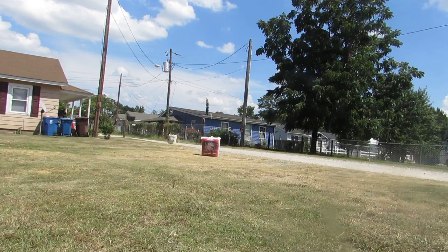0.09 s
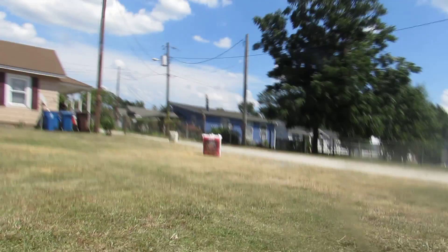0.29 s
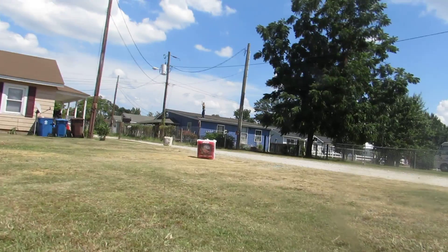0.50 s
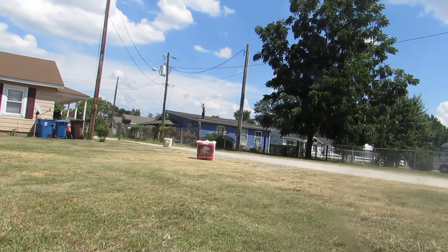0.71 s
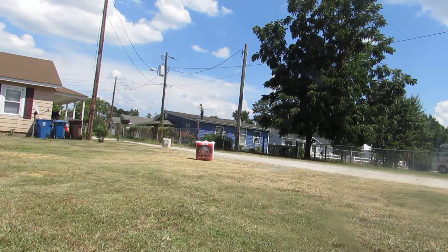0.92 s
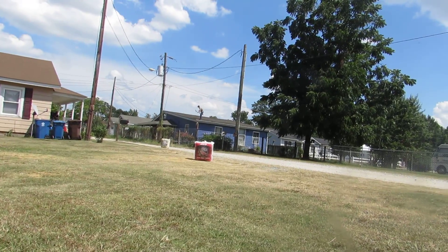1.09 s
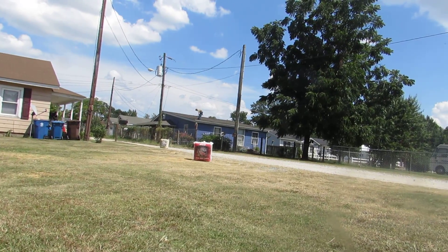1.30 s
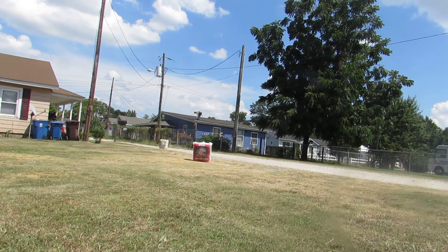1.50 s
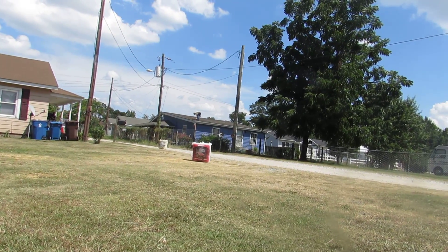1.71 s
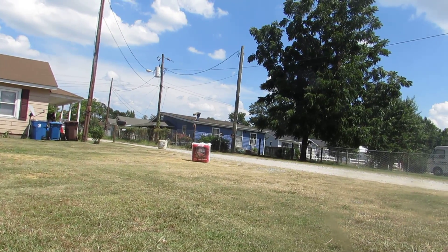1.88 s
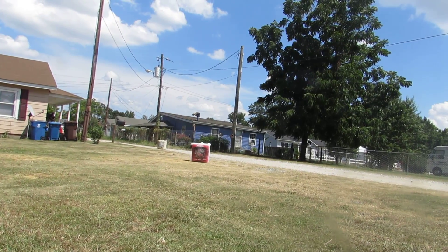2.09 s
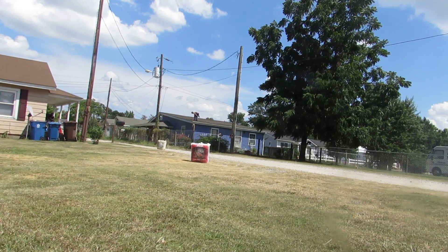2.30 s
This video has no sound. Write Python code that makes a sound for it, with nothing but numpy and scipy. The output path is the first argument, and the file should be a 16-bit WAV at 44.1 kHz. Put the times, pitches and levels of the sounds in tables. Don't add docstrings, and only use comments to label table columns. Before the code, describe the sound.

Outdoors on a lawn, a brief rising hiss ends in a sharp overloaded thwack and dead thud, followed by gritty scratches and dull knocks; wind rumbles on the microphone while the ducked background creeps back.

```python
import sys
import numpy as np
from scipy import signal
from scipy.fft import rfft, irfft
from scipy.io import wavfile
from scipy.ndimage import uniform_filter1d

SR = 44100
rng = np.random.default_rng(int(sys.argv[2]) if len(sys.argv) > 2 else 0)


def master(y):
    cut = np.clip(np.atleast_2d(y).T, -1, 1)
    pcm = np.round(cut * 32767)
    wavfile.write(sys.argv[1], SR, pcm.astype(np.int16))


def natural_amplitude(level_db):
    exponent = np.asarray(level_db, float) / 20
    return 10 ** exponent


N = 110250
TIME = np.arange(N) / SR
HIT_S = .201761


def evened(x):
    return x / np.sqrt(np.mean(x ** 2) + 1e-20)


def read(points, hz):
    f, value = np.transpose(points)
    return np.interp(np.log(hz + 1), np.log(f + 1), value)


def coloured(points, same, lean=((1, 0), (2, 0))):
    a, b = rfft(rng.standard_normal((2, N)))
    hz = np.fft.rfftfreq(N, 1 / SR)
    like = np.clip(read(same, hz), 0, 1)
    pair = np.array([a, like * a + np.sqrt(1 - like ** 2) * b])
    level_db = read(points, hz) + np.array([[.5], [-.5]]) * read(lean, hz)
    return evened(irfft(pair * natural_amplitude(level_db), N))


def resonant(x, peaks):
    ringing = 0
    for hz, width, db in peaks:
        b, a = signal.iirpeak(hz, hz / width, SR)
        ringing = ringing + natural_amplitude(db) * signal.lfilter(b, a, x)
    return evened(ringing)


def burst(s, db, rise, t60):
    u = TIME - s
    rising = np.exp(np.minimum(u, 0) / abs(rise))
    falling = natural_amplitude(-60 * np.maximum(u, 0) / abs(t60))
    return natural_amplitude(db) * np.where(u < 0, rising, falling)


def slow(top_hz, size):
    t = np.linspace(0, N / SR, size[1])
    curves = 0
    for f in np.geomspace(.3, top_hz, num=16):
        curves = curves + np.sin(2 * np.pi * (f * t + rng.random((size[0], 1)))) / np.sqrt(f)
    return evened(curves)


def wash(points, db, patchy_db, swell_db, gust_hz):
    # frequency in Hz, left-right likeness from 0 to 1.
    likeness = [(60, 1), (180, 0.99), (400, 0.33), (950, 0.65), (2400, 0.85), (3500, 0.86), (6000, 0.68),
                (15000, 0.1)]
    # frequency in Hz, lean to the left in dB.
    left_lean = [(60, 0), (150, .5), (380, 1), (950, -1.5), (2400, -.5), (15000, -.5)]
    frames, hz = N // 256 + 5, np.fft.rfftfreq(1024, 1 / SR)
    a, b, c, d, patches = rng.standard_normal((frames, len(hz), 5)).T
    patches = uniform_filter1d(patches, size=10, axis=0)
    patches = evened(uniform_filter1d(patches, size=10, axis=1))
    same = np.clip(read(likeness, hz), -1, 1)[:, None]
    tilt = natural_amplitude(read(left_lean, hz) / 2)[:, None]
    left = a + 1j * b
    right = same * left + np.sqrt(1 - same ** 2) * (c + 1j * d)
    swell = swell_db * slow(gust_hz, size=(1, frames))
    level_db = read(points, hz)[:, None] + patchy_db * patches + swell
    spectra = np.array([left * tilt, right / tilt]) * natural_amplitude(level_db)
    return natural_amplitude(db) * evened(signal.istft(spectra, nperseg=1024, noverlap=768)[1][:, :N])


def duck():
    u = np.maximum(TIME - HIT_S, 0)
    attack_s = .006
    lasting_db = 15 * np.exp(-u / .8)
    grab_db = 34 * np.exp(-u / .021)
    return natural_amplitude(-(1 - np.exp(-u / attack_s)) * (lasting_db + grab_db))


def yard():
    # frequency in Hz, level in dB per Hz.
    spectrum = [(150, -29), (260, -3.5), (1370, -8.5), (1810, -17), (3360, -24.5), (8000, -24.5),
                (11500, -31), (15300, -38)]
    return wash([(120, -40)] + spectrum, -46, patchy_db=0.0, swell_db=0.7, gust_hz=7.6)


def wind():
    # frequency in Hz, level in dB per Hz.
    spectrum = [(12, -46), (20, -23), (45, -13), (86, -0.5), (112, -1.5), (141, -3), (168, -4.5),
                (262, -14), (500, -28), (650, -42), (1100, -120)]
    # time in seconds, level in dB.
    gusts = [(0.36, -51.5), (0.42, -46.5), (0.45, -52.5), (0.57, -51.5), (0.6, -43), (0.66, -45.5),
             (1.33, -43), (1.42, -46.5), (1.51, -38.5), (1.59, -47), (1.68, -37.5), (1.86, -49),
             (2.0, -39.5), (2.5, -41.5)]
    hum_hz, hum_width_hz = 117.4, 10
    hum = resonant(rng.standard_normal(N), [(hum_hz, hum_width_hz, 0)])
    hum = natural_amplitude(-44.5) * resonant(hum, [(hum_hz, 2 * hum_width_hz, 0)])
    rumble = wash(spectrum + [(900, -77)], -42, patchy_db=1.5, swell_db=-1.3, gust_hz=11)
    s, db = np.transpose(gusts)
    level_db = np.interp(TIME, s, db) - db[-1]
    return (rumble + hum) * np.where(TIME < s[0], duck(), natural_amplitude(level_db))


def screen_whistle():
    return natural_amplitude(-74) * np.sin(2 * np.pi * 15734.5 * TIME)


def fan():
    # multiple of the blade rate, early level in dB, late level in dB.
    multiples = [(16, -78, -75), (17, -82, -82), (18, -83, -70), (19, -74, -73), (20, -84, -76),
                 (21, -78, -76), (22, -81, -77), (23, -78, -81), (24, -68, -77), (25, -78, -75),
                 (26, -76, -70), (27, -70, -75), (28, -81, -66), (29, -70, -69), (30, -76, -74),
                 (31, -70, -76), (32, -77, -77), (33, -70, -75), (34, -80, -78), (35, -74, -74),
                 (36, -84, -81), (37, -76, -72), (39, -80, -79), (41, -80, -80)]
    # frequency in Hz, level in dB.
    whine = [(5957, -70), (6444, -76)]
    blade_hz, drift_hz_per_s = 242.92, .716
    turns = blade_hz * TIME + drift_hz_per_s * TIME ** 2 / 2
    tones = [(k * turns, early_db, late_db) for k, early_db, late_db in multiples]
    tones += [(hz * TIME, db, db) for hz, db in whine]
    fades = slow(3.0, size=(len(tones), 100))
    luck = rng.standard_normal((len(tones), 2))
    out = 0
    for (phase, early_db, late_db), fade, (start, spread) in zip(tones, fades, luck):
        level_db = np.interp(TIME, [.6, 2.1], [early_db, late_db])
        level_db = level_db + 2.2 * np.interp(TIME, np.linspace(0, TIME[-1], len(fade)), fade)
        side_phase = 0.35 * spread * np.array([[1], [-1]])
        out = out + natural_amplitude(level_db) * np.sin(2 * np.pi * (phase + start) + side_phase)
    return natural_amplitude(6 + np.array([[-.4], [.4]])) * out


def birds():
    # start in seconds, length in seconds, level in dB, first Hz, last Hz.
    chips = [
        (.355, .055, -50, 6400, 5750),
        (.888, .058, -53, 6750, 5650),
        (2.06, .09, -61, 5350, 5250),
    ]
    out = 0
    for s, length, db, first_hz, last_hz in chips:
        u = np.clip((TIME - s) / length, 0, 1)
        warble = 110 * np.sin(2 * np.pi * 90 * TIME)
        hz = first_hz + (last_hz - first_hz) * u + warble
        out = out + natural_amplitude(db) * np.sin(np.pi * u ** 1.4) * np.sin(2 * np.pi * np.cumsum(hz) / SR)
    echo_s = np.arange(SR // 5) / SR
    tail = rng.standard_normal(SR // 5) * natural_amplitude(-60 * echo_s / .25)
    out = out + natural_amplitude(-1.5) * signal.oaconvolve(out, tail / np.linalg.norm(tail))[:N]
    scrape_hz = 2480
    scrape = resonant(rng.standard_normal(N), [(scrape_hz, 300, 0), (3300, 300, -5)])
    scrape = resonant(scrape, [(scrape_hz, 550, 0)])
    return out + natural_amplitude(-55) * scrape * np.exp(-((TIME - 1.638) / .05) ** 2)


def flight():
    # frequency in Hz, level in dB per Hz.
    spectrum = [(800, 3), (3000, 0.5), (7000, 0.5), (13000, 1), (16000, -7)]
    # frequency in Hz, left-right likeness from 0 to 1.
    likeness = [(1500, .9), (4000, .99), (9000, .95), (15000, .88)]
    near_s = 0.0084
    left_s = HIT_S - TIME
    nearness = near_s / (near_s + abs(left_s))
    return coloured(spectrum, likeness) * natural_amplitude(-33) * (left_s > 0) * nearness


def rattles():
    # peak time in seconds, level in dB, rise in seconds, t60 in seconds, brightness in dB.
    scratches = [(0.213, -37, 0.0034, 0.014, -22), (0.2319, -44, 0.00054, 0.004, 6),
                 (.2370, -32.5, 0.000085, 0.0068, 13.5), (0.2384, -33.5, 0.0018, 0.016, -22),
                 (0.2435, -49, .001, .02, -21), (.251, -35, .0005, 0.014, -19),
                 (0.255, -41.5, 0.0027, 0.048, -29), (0.2586, -34.5, .0005, 0.033, -12),
                 (.279, -37.5, 0.0017, 0.041, -22), (.301, -34, 0.0019, 0.031, -7.5),
                 (0.3084, -32, 0.00064, 0.019, -15)]
    # frequency in Hz, width in Hz, level in dB.
    shaft_low = [(500, 290, -1.5), (1310, 1300, -4), (2540, 320, 4), (3940, 1800, -7.5)]
    # Hz, Hz, dB.
    shaft_high = [(6800, 870, 13), (10300, 2000, 1), (14000, 3600, -19)]
    # centre in seconds, level in dB, frequency in Hz, length in cycles.
    bumps = [
        (0.23, -38, 80, 1.2),
        (.27, -35, 70, 1.5),
        (.25, -34.5, 347, 1.8),
        (0.313, -37.5, 204, 1.1),
        (0.326, -33, 163, 1.25),
        (.42, -32, 70, 1.26),
    ]
    # frequency in Hz, left-right likeness from 0 to 1.
    likeness = [(500, 0.53), (2000, 0.78), (5000, .3), (15000, .1)]
    grain_db, grain_s = 4.0, 0.00052
    grit = coloured([(300, 1), (1000, 2.5), (16000, -9.5)], likeness)
    lumps = uniform_filter1d(rng.standard_normal(N), size=max(round(grain_s * SR), 1))
    grit = grit * natural_amplitude(grain_db * evened(lumps))
    low, high = resonant(grit, shaft_low), resonant(grit, shaft_high)
    out = 0
    for s, db, rise, t60, bright_db in scratches:
        out = out + burst(s, db, rise, t60) * (low + natural_amplitude(bright_db) * high)
    for s, db, hz, cycles in bumps:
        u = (TIME - s) * hz
        out = out + natural_amplitude(db) * np.exp(-(2 * u / cycles) ** 2) * np.cos(2 * np.pi * u)
    return out


def smack():
    # frequency in Hz, signed swing, t60 in seconds.
    modes = [(125.4, -1.196, .0398), (197.2, 9.893, .005), (268.7, -.805, .0303), (377.3, -1.904, .0267),
             (720.1, .889, .0353), (728.1, -1.728, .0133)]
    # frequency in Hz, level in dB per Hz.
    crack_spectrum = [(1000, -4), (2200, -3), (3100, -8.5), (4100, 2), (5300, -12), (7200, -8),
                      (11300, -13.5), (16000, -32)]
    # frequency in Hz, left-right likeness from 0 to 1.
    likeness = [(1500, .98), (4000, .97), (9000, .85), (15000, .7)]
    # frequency in Hz, lean to the left in dB.
    crack_lean = [(60, 1), (950, -2), (3770, -.5), (7000, 3), (15000, 4)]
    echo_delay_s, echo_gain = .002752, -.71
    thud = 0
    for s, push in (HIT_S, 1), (HIT_S + echo_delay_s, echo_gain):
        u = np.maximum(TIME - s, 0)
        for hz, swing, t60 in modes:
            thud = thud + push * swing * np.sin(2 * np.pi * hz * u) * natural_amplitude(-60 * u / t60)
    crack = coloured([(500, -43.5)] + crack_spectrum, likeness, lean=crack_lean)
    crack = crack * burst(.2047, -8.5, rise=.0010, t60=.0085) * (TIME > HIT_S)
    return thud * natural_amplitude(np.array([[.5], [-.5]])) + crack


def scene():
    gain = duck()
    behind = (yard() + fan() + birds()) * gain
    whistle = screen_whistle() * gain ** 0.53
    return behind + whistle + wind() + flight() + rattles() + smack()


def band_limit(x):
    return signal.sosfilt(signal.butter(12, 16370, fs=SR, output="sos"), x)


def record(dry):
    edge = signal.firwin(1023, 15910, window=("kaiser", 8), fs=SR)[None]
    limited = signal.oaconvolve(np.clip(dry, -1, 1), edge, "same")
    return band_limit(np.clip(limited, -1, 1))


dry = scene()
out = record(dry)
master(out)
```